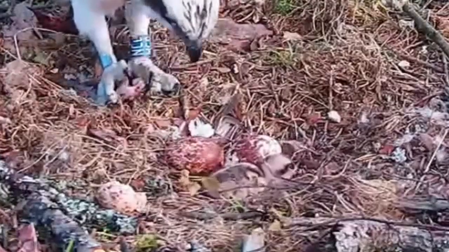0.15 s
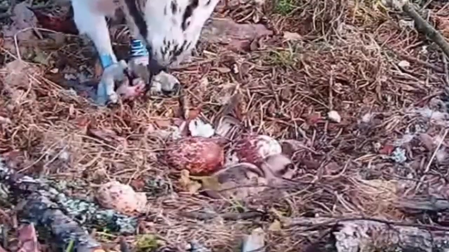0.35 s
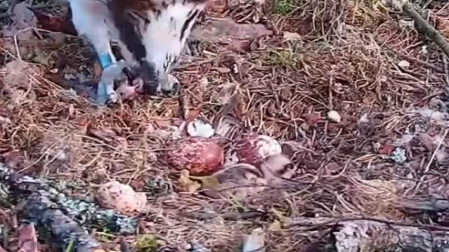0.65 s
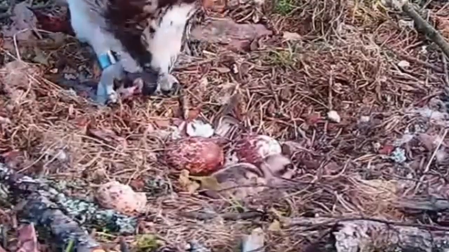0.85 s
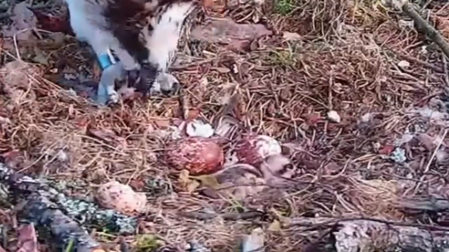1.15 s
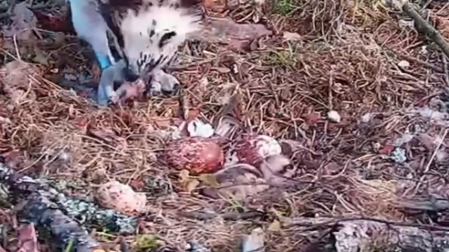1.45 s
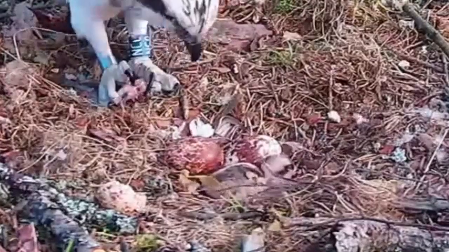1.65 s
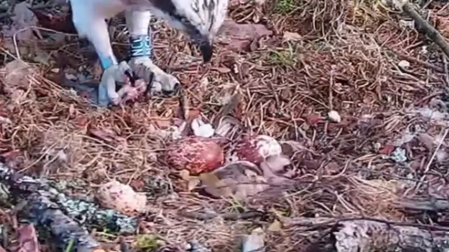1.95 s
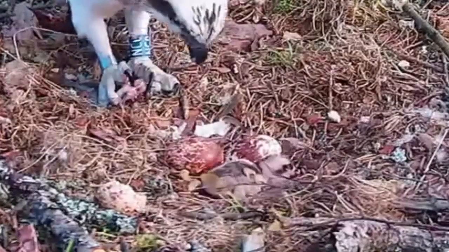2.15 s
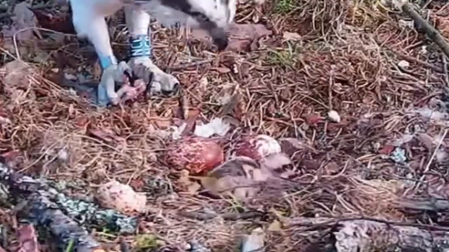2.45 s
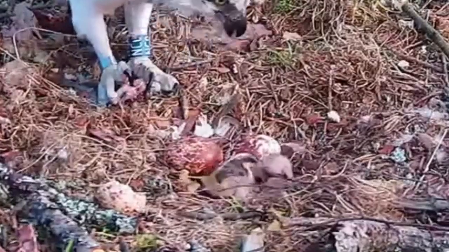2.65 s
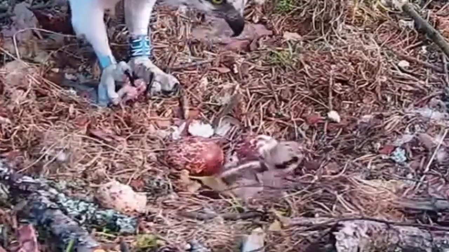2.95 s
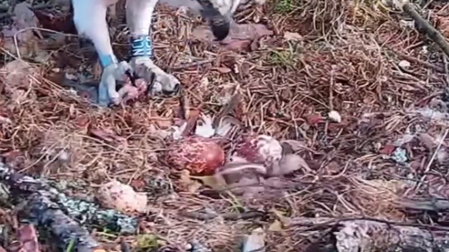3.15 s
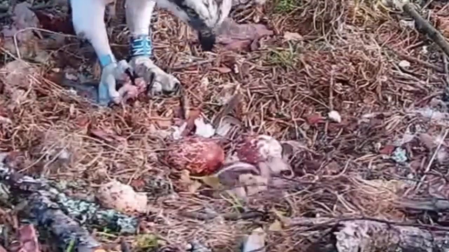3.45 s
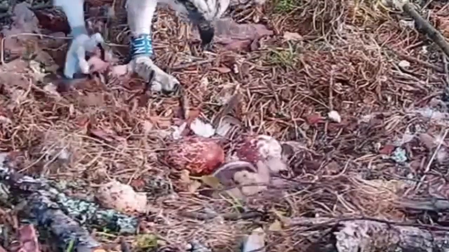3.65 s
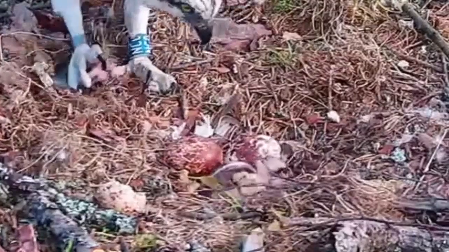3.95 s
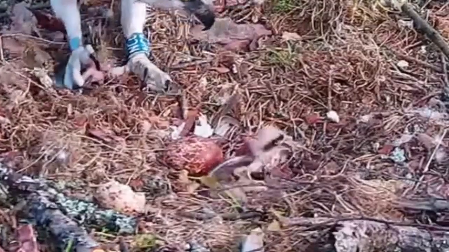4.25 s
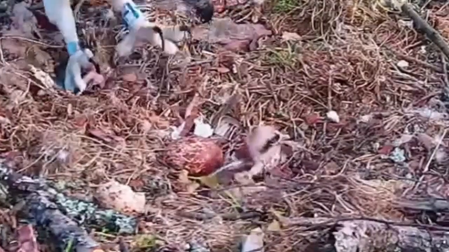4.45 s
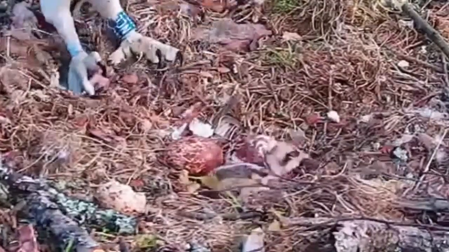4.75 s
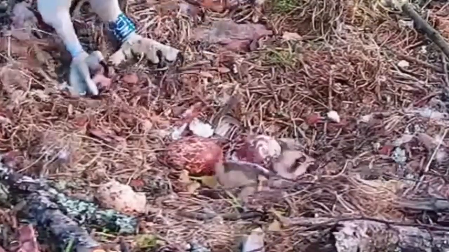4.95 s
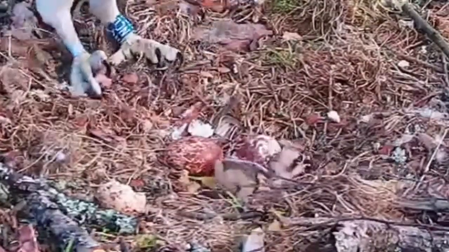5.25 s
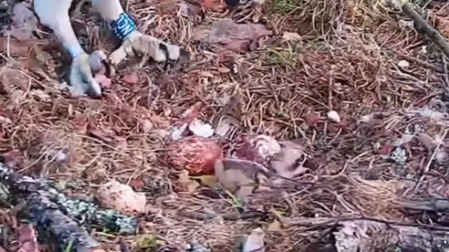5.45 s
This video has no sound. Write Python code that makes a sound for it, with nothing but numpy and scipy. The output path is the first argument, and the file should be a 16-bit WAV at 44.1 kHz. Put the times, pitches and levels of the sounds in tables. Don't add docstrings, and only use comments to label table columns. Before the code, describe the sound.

A nestling's short hoarse peeps sound close by over low rumbling wind, then a more distant songbird whistles, buzzes and trills with a woodland echo.

```python
import sys
import numpy as np
from scipy import signal
from scipy.fft import rfft, irfft
from scipy.io import wavfile
from scipy.ndimage import uniform_filter1d

SR = 44100
rng = np.random.default_rng(int(sys.argv[2]) if len(sys.argv) > 2 else 0)


def gain_from_db(level_db):
    decades = np.asarray(level_db, float) / 20
    return 10 ** decades


def bounce(signal):
    frames = np.transpose(np.atleast_2d(signal))
    limited = np.clip(frames, -1, 1)
    pcm = np.round(limited * 32767).astype(np.int16)
    wavfile.write(sys.argv[1], SR, pcm)


N = 246959
TIME_S = np.arange(N) / SR

# start_s, length_s, top_hz, level_db, closing_swell_db
PEEPS = [
    (0.217, 0.054, 2720, -55.5, 5.5),
    (0.545, 0.057, 2605, -56.5, 9),
    (1.061, 0.062, 2276, -59, 13),
    (1.403, 0.056, 2770, -56, 9),
    (1.743, 0.054, 2764, -56.5, 7),
    (2.046, 0.076, 3060, -56, -1),
    (2.39, 0.06, 3150, -55.5, 11.5),
    (2.702, 0.043, 2800, -58, 20),
]
# length_share, slack_to_top_share, relative_db, swell_share
PEEP_SHAPE = [(0, .86, -3, 0), (.22, 1, 0.5, 0), (0.481, .94, -1, 0), (.7, .6, -4, 0.0067),
              (0.852, .2, -3.5, 0.64), (1, 0.037, -15.5, 1)]
# start_s, length_s, first_hz, second_hz, level_db
STEADY_PIPS = [(.46, 0.019, 2510, 2520, -66), (.492, 0.022, 2010, 2000, -72),
               (2.709, 0.011, 1510, 1550, -57), (5.457, 0.039, 1710, 1744, -50.5)]
ARCHED_PIPS = [(5.334, 0.063, 1600, 2040, -58)]
EASED_PIPS = [(4.404, .054, 1387, 2050, -63), (4.39, .05, 760, 1050, -68)]

# length_share, first_to_second_pitch_share, relative_db
CLIMB = [(0, 0.016, -15), (.4, 0.151, -11), (.7, .45, -7), (1, 1, 0)]
LIFT = [(0, 0.027, 6), (0.502, 0.51, -2.5), (1, 1, 2)]
EASE = [(0, 0.052, -0.042), (.3, 0.73, -2.7), (.65, .92, -2), (1, 1, -1.3)]
SOAR = [(0, 0, -4), (.15, .42, 0), (.33, .76, 0), (.6, .92, -2), (1, 0.94, -1)]
DROP = [(0, 0.028, 5), (.42, 0.11, -13), (1, 1, -24)]
SLIDE = [(0, 0.04, -11), (.17, 0.173, -4), (.5, .44, -2), (1, 1, -6.5)]
ARCH = [(0, 0.069, -1.5), (.3, 1, -7), (.65, 1, -7), (1, 0.25, -3)]
SWOOP = [(0, 0, -10), (.07, .4, 0), (.13, .64, -10), (.2, .82, -2), (.5, 1, -3.5), (.8, .92, -1),
         (.9, 1.06, -3), (1, 1.55, -10)]
HANG = [(0, 0, -1), (.08, .45, -7), (.2, .72, -1.5), (0.519, 0.96, 1), (.8, 1, 1), (1, .85, -5)]
STEADY = [(0, 0, -20), (.27, .3, -11), (.35, .4, 3), (.6, 1, 3), (.82, .8, -2.5), (1, 0, -24)]
# start_s, length_s, first_hz, second_hz, level_db; the last arch doubles the
# 5.334 s pip an octave up
CLIMBS = [(1.612, 0.029, 4520, 6270, -60), (2.765, .04, 3300, 3760, -56), (3.57, 0.055, 2950, 4160, -60),
          (3.65, 0.051, 4140, 4300, -52.5), (3.77, 0.033, 2600, 3750, -58), (3.985, 0.029, 2570, 4560, -55),
          (4.185, 0.037, 2515, 4720, -53.5), (4.908, 0.042, 2950, 4650, -54),
          (4.922, 0.027, 3000, 4240, -49.5)]
LIFTS = [(1.728, 0.021, 4350, 6200, -65.5), (2.808, .022, 3360, 3900, -71),
         (3.022, .024, 4380, 4830, -69.5), (3.213, .022, 3380, 3750, -73),
         (3.653, 0.041, 2650, 3190, -66.5), (3.7, 0.035, 4300, 4550, -66), (3.838, 0.021, 3170, 3270, -65),
         (4.008, 0.0091, 3500, 3680, -61), (4.215, .007, 3910, 3660, -58),
         (4.335, 0.015, 3040, 2330, -64.5), (5.22, 0.064, 5420, 6830, -75), (5.325, 0.028, 4900, 5840, -76),
         (5.36, 0.03, 5900, 6800, -71), (5.478, 0.024, 5800, 6600, -70)]
EASES = [(1.935, 0.037, 3600, 4610, -66), (3.562, 0.09, 4380, 4066, -58), (3.798, 0.025, 2620, 2190, -66),
         (3.99, 0.03, 2650, 3650, -61.5)]
UNDERTONES = [(2.03, .082, 3150, 3480, -72), (2.29, .09, 2900, 3230, -69), (2.49, .076, 2950, 3340, -70.5),
              (2.975, .04, 3230, 3550, -68)]
SOARS = [(5.447, 0.023, 4130, 5800, -66.5), (5.562, 0.036, 3800, 5950, -62.5)]
DROPS = [(2.108, 0.015, 3420, 2520, -66), (4.028, 0.036, 4200, 3050, -57),
         (4.234, 0.028, 4230, 3220, -53.5)]
SLIDES = [(1.968, 0.067, 5180, 4030, -63.5), (3.305, 0.13, 3470, 2470, -58)]
ARCHES = [(4.903, 0.011, 2950, 2940, -57), (3.532, 0.031, 3260, 3100, -60), (3.695, 0.092, 4850, 5260, -61),
          (3.77, .075, 4800, 5020, -69), (3.876, 0.031, 2800, 2910, -65), (5.148, 0.021, 3530, 4000, -58),
          (5.334, 0.055, 3200, 4100, -70)]
SWOOPS = [(2.126, 0.13, 5760, 4080, -65.5), (2.32, 0.12, 6060, 4010, -64), (2.518, .122, 5740, 3960, -61),
          (2.914, 0.13, 5550, 3870, -63.5)]
HANGS = [(3.352, .188, 5330, 4190, -58.5)]
# offset_s, pitch_hz, relative_db
WARBLE = [(0, 2957, -7), (.01, 3436, -1), (.027, 2900, -1), (.046, 2490, -18), (.088, 3210, 3.5),
          (.108, 3720, -12), (.121, 4300, -2.5), (.141, 2950, -12)]
# start_s, level_db
WARBLES = [
    (2.7, -54.5),
    (3.102, -61.5),
]
# offset_s, pitch_hz, relative_db
FLICK = [(0, 4740, -9), (.003, 4520, 5.5), (.007, 3750, 3.5)]
ANSWER = [(0.013, 2900, -2), (0.023, 2800, -4.5), (.031, 2310, -4), (.04, 2250, -4)]
# start_s, level_db
FIGURES = [
    (4.396, -66),
    (4.474, -68),
    (4.549, -63),
    (4.628, -62),
    (4.704, -59.5),
]
# start_s, length_s, centre_hz, first_db, last_db
THIN_TRILLS = [(1.83, .055, 4910, -65, -74), (3.175, .03, 4800, -70, -69), (3.5, 0.031, 4800, -69, -57),
               (3.545, 0.039, 4740, -63, -67), (3.585, 0.034, 4550, -61, -60.5),
               (3.715, .06, 4570, -55, -65), (3.775, .07, 4640, -63, -62), (3.928, 0.048, 5020, -58, -75),
               (4.133, 0.013, 4900, -64, -54), (4.148, 0.014, 4740, -59, -53),
               (4.168, 0.013, 4940, -69, -71), (5.1, 0.12, 2290, -70, -67)]
HARSH_TRILLS = [(3.8, 0.17, 3590, -63, -73), (4.02, 0.043, 3620, -57, -68), (4.06, .075, 3600, -70, -62),
                (4.23, 0.037, 3700, -58, -66), (4.27, 0.11, 3630, -66, -66.5), (4.38, 0.14, 2900, -73, -70),
                (4.54, 0.06, 2720, -74, -64), (4.61, 0.095, 2800, -74, -83), (4.75, 0.084, 2690, -63, -69),
                (4.952, 0.033, 3850, -58, -64), (4.975, 0.082, 3700, -70, -65)]
SLOW_TRILLS = [(5.0, 0.042, 3400, -76, -67), (5.04, 0.092, 3270, -61.5, -63),
               (5.12, 0.08, 3180, -63, -62.5), (5.2, 0.06, 3200, -66, -69), (5.26, 0.055, 3300, -68, -69)]
# swing_hz, rate_hz, unevenness_0_to_1
THIN_SWING = (450, 215, .25)
HARSH_SWING = (540, 265, .3)
SLOW_SWING = (295, 110, .13)
# delay_s, level_db
ECHOES = [(.0082, -10), (.0195, -16)]

# time_s, level_db
GUSTS = [(0, -48.5), (.5, -46.5), (.8, -46.5), (.96, -38.5), (1.15, -47), (1.3, -40), (1.62, -37.5),
         (1.76, -34), (2.1, -36), (2.45, -46), (3.05, -43), (3.5, -38.5), (3.7, -32), (4.1, -37.5),
         (4.6, -36), (4.96, -33.5), (5.1, -30), (5.6, -31.5)]
# centre_s, length_s, over_gust_db
LEVEL_BUMPS = [(.57, .06, 3), (1.31, .08, 3), (1.78, .06, 4), (2.44, .08, -6), (2.63, .1, 4), (2.73, .08, -3),
               (2.8, .06, 4), (2.92, .07, 4), (2.98, .06, -4), (3.24, .1, 4), (3.89, .08, -4), (4.42, .12, -3),
               (4.55, .1, 5), (4.65, .06, -8), (4.71, .05, -9), (4.79, .1, 3), (5.07, .07, 6), (5.16, .06, 2),
               (5.42, .1, -3), (5.51, .08, 6), (5.592, .05, -14)]
# freq_hz, density_db
RUMBLE = [(8.8, -40), (15, -2), (54, 0.5), (81, -4), (110, -11.5), (140, -20), (240, -120)]
BUFFET = [(59, -54), (100, -1), (268, -17.5), (590, -32), (700, -33.5), (910, -49), (1540, -120)]
# start_s, length_s, level_db, centre_hz, width_hz
RUSTLES = [
    (3.925, .022, -73, 7500, 1500),
    (4.41, .1, -68.5, 7300, 4400),
    (4.44, .08, -76, 13500, 4000),
    (4.2, .7, -65.5, 1900, 2600),
    (-.3, 1.1, -64, 420, 400),
    (4.735, .065, -69, 6000, 11000),
    (4.79, .055, -70, 5500, 7000),
    (1.3, .3, -73, 5000, 1200),
]
# start_s, peak_db, ring_hz, t60_s
TICKS = [(1.3677, -41, 720, .028), (4.765, -56, 8800, .01), (4.765, -58, 14200, .01),
         (4.771, -54, 6100, .03), (4.767, -50, 900, .012), (4.7705, -50, 1500, .008),
         (4.772, -54, 3500, .012), (4.304, -57, 3500, .015), (.748, -55, 1700, .008),
         (2.021, -54, 2700, .01), (1.374, -59, 4800, .02), (1.516, -56, 3200, .008),
         (5.5935, -26.5, 36, .3), (2.3895, -47.5, 2950, .04), (2.7015, -48, 2450, .05)]
# freq_hz, density_db
AIR = [(150, -2), (250, -0.5), (579, -6.5), (815, -4.5), (1480, -12.5), (7060, -24), (11000, -29.5),
       (14200, -29), (15000, -36)]
# time_s, level_db
LEAVES = [
    (0, -72.5),
    (.5, -73),
    (1.3, -72),
    (2.2, -77),
    (3.3, -76.5),
    (4.2, -79),
    (5.6, -80.5),
]
# centre_hz, width_hz, relative_db
FOLIAGE = [(5200, 1300, -6.5), (7100, 2300, -1), (8900, 2800, -8)]
# from_s, pitch_hz
WHINE = [(0, 15625), (1.19, 15592), (1.28, 15608), (1.38, 15642), (2.02, 15625), (2.87, 15608),
         (2.95, 15625), (3.05, 15608), (3.14, 15625), (3.97, 15592), (4.07, 15625), (5.09, 15608),
         (5.27, 15625)]


def unit(x):
    return x / np.sqrt(np.mean(x ** 2))


def coloured(points):
    hz, db = np.transpose(points)
    bins_hz = np.arange(1, N // 2 + 2) * SR / N
    gain = gain_from_db(np.interp(np.log(bins_hz), np.log(hz), db, left=-120, right=-120))
    return unit(irfft(rfft(rng.standard_normal(N)) * gain, N))


def hump(hz, width_hz, edge_db=-25):
    return coloured([
        (max(hz - 0.94 * width_hz, hz / 8), edge_db),
        (max(hz - width_hz / 2, hz / 3), -3),
        (hz, 0),
        (hz + width_hz / 2, -3),
        (hz + 2.2 * width_hz, edge_db)])


def walk(rate_hz, size=N):
    hold = max(int(SR / rate_hz), 1)
    steps = np.repeat(rng.standard_normal(size // hold + 1), hold)
    return 1.42 * uniform_filter1d(uniform_filter1d(steps, hold), hold)[:size]


def notes(rows, shape):
    return [[(s + u * length_s, hz0 + way * (hz1 - hz0), db + rel_db) for u, way, rel_db in shape]
            for s, length_s, hz0, hz1, db in rows]


def voice(call, edge_s, flutter_db, wobble, swing_hz=0., rate_hz=1., uneven=0.,
          round_s=.0067, octave_db=-60., throat_hz=2800.0, scoop=0.):
    s, hz, db = np.transpose(sorted(call))
    a, b = int((s[0] - edge_s) * SR), min(int((s[-1] + edge_s) * SR), N)
    size = b - a
    t = TIME_S[a:b]
    pitch_hz = uniform_filter1d(np.interp(t, s, hz), int(round_s * SR), mode="nearest")
    onset_sag = scoop * np.exp(-(t - t[0]) / 0.00193)
    end_sag = scoop / 3 * np.exp((t - t[-1]) / 0.0024)
    pitch_hz = pitch_hz * (1 - onset_sag - end_sag)
    glide_hz_per_s = np.gradient(pitch_hz) * SR

    falling = np.clip(-glide_hz_per_s / 30000, 0, 1)
    octave = gain_from_db(octave_db) * falling / (1 + ((2 * pitch_hz - throat_hz) / 420) ** 2)
    swing = np.sin(2 * np.pi * np.cumsum(rate_hz * (1 + uneven * walk(80.3, size=size))) / SR)
    reach_hz = swing_hz * (1 + uneven * walk(54, size=size))
    wobble = wobble + .013 * np.clip(glide_hz_per_s / 35000, 0, 1)
    sung_hz = pitch_hz * (1 + wobble * walk(300, size=size)) + reach_hz * swing
    phase = 2 * np.pi * np.cumsum(sung_hz) / SR

    fade = np.clip(np.minimum(t - t[0], s[-1] + edge_s - t) / (2 * edge_s), 0, 1)
    level = gain_from_db(np.interp(t, s, db) + flutter_db * walk(250.7, size=size))
    out = np.zeros(N)
    out[a:b] = np.sqrt(2) * fade * level * (np.sin(phase) + octave * np.sin(2 * phase))
    return out


def forest(x, t60_s, wet_db, gap_s):
    t = TIME_S[:SR // 2]
    tail = rng.standard_normal(len(t)) * gain_from_db(-60 * t / t60_s) * (t > gap_s)
    tail = tail / np.sqrt(np.sum(tail ** 2))
    return x + gain_from_db(wet_db) * signal.fftconvolve(x, tail)[:N]


def chick():
    slack_hz = 1200
    arches = [[(s + u * length_s, slack_hz + way * (top_hz - slack_hz), db + rel_db + share * swell_db)
               for u, way, rel_db, share in PEEP_SHAPE]
              for s, length_s, top_hz, db, swell_db in PEEPS]
    peeps = sum(voice(call, .0015, 2.1, .01, octave_db=-5.5, scoop=.22) for call in arches)
    clear = notes(STEADY_PIPS, STEADY) + notes(ARCHED_PIPS, ARCH) + notes(EASED_PIPS, EASE)
    pips = sum(voice(call, .003, 1.2, .002) for call in clear)
    return forest(peeps, t60_s=.1, wet_db=-8.5, gap_s=.004) + pips


def songbird():
    kinds = ((CLIMBS, CLIMB), (LIFTS, LIFT), (EASES + UNDERTONES, EASE), (SOARS, SOAR), (DROPS, DROP),
             (SLIDES, SLIDE), (ARCHES, ARCH), (SWOOPS, SWOOP), (HANGS, HANG))
    whistles = [call for rows, shape in kinds for call in notes(rows, shape)]
    whistles += [np.add(WARBLE, (s, 0, db)).tolist() for s, db in WARBLES]
    figures = [np.add(part, (s, 0, db)).tolist() for s, db in FIGURES for part in (FLICK, ANSWER)]
    clear = sum(voice(call, .004, 2.3, .003) for call in whistles)
    clear = clear + sum(voice(call, .0015, 2, .01, round_s=.002) for call in figures)

    buzzes = ((THIN_TRILLS, THIN_SWING), (HARSH_TRILLS, HARSH_SWING), (SLOW_TRILLS, SLOW_SWING))
    trills = sum(voice([(s, hz, db0), (s + length_s, hz, db1)], .007, 3.4, .014, *swing)
                 for rows, swing in buzzes for s, length_s, hz, db0, db1 in rows)

    echoes = sum(gain_from_db(db) * np.roll(clear, int(s * SR)) * (TIME_S > s) for s, db in ECHOES)
    far_clear = forest(clear + echoes, t60_s=0.62, wet_db=-10.5, gap_s=0.0065)
    far_trills = forest(trills, t60_s=.44, wet_db=-6, gap_s=.003)
    return gain_from_db(-0.5) * far_clear + gain_from_db(-1.5) * far_trills


def wind():
    gust_db = np.interp(TIME_S, *np.transpose(GUSTS))
    gust_db = gust_db + sum(db * np.exp(-(2 * (TIME_S - s) / length_s) ** 2) for s, length_s, db in LEVEL_BUMPS)
    rumble = gain_from_db(gust_db + 2.1 * walk(12)) * coloured(RUMBLE)
    buffet_db = -40 - 11.5 + 0.77 * (gust_db + 40)
    return rumble + gain_from_db(buffet_db + 0.78 * walk(20)) * coloured(BUFFET)


def litter():
    out = np.zeros(N)
    for s, length_s, db, hz, width_hz in RUSTLES:
        arc = np.sin(np.pi * np.clip((TIME_S - s) / length_s, 0, 1))
        swell = np.sqrt(np.clip(arc, 0, 1))
        out += gain_from_db(db + 2.5 * walk(400)) * swell * hump(hz, width_hz)
    for s, db, hz, t60_s in TICKS:
        start = int(s * SR)
        t = TIME_S[:min(SR // 20, N - start)]
        attack = np.minimum(t / .001, 1)
        out[start:][:len(t)] += gain_from_db(db - 60 * t / t60_s) * attack * np.sin(2 * np.pi * hz * t)
    return out


def air():
    level_db = np.interp(TIME_S, *np.transpose(LEAVES))
    leaves = sum(gain_from_db(level_db + db + 2.5 * walk(27.9)) * hump(hz, width_hz, edge_db=-23)
                 for hz, width_hz, db in FOLIAGE)
    hiss = gain_from_db(-59.5 + .4 * walk(2.83)) * coloured(AIR + [(16000, -23)])
    return hiss + leaves


def whine():
    field_hz = 50
    s, hz = np.transpose(WHINE)
    pitch_hz = hz[np.searchsorted(s, TIME_S, side="right") - 1]
    phase = 2 * np.pi * np.cumsum(pitch_hz) / SR
    field = 2 * np.pi * field_hz * TIME_S
    throb = 1 + .3 * np.sin(field) + .4 * np.sin(2 * field)
    return gain_from_db(-68) * throb * np.sin(phase)


def scene():
    return (chick() + songbird() + wind() + litter() + air() + whine())[None]


def roll_off(x):
    return signal.sosfilt(signal.butter(12, 15930, fs=SR, output="sos"), x)


def record(dry):
    top_hz = 15715
    bins_hz = np.arange(N // 2 + 1) * SR / N
    edge = np.clip((top_hz + 30 - bins_hz) / 40, 0, 1)
    mix = irfft(rfft(dry) * edge, N)
    return roll_off(mix)


dry = scene()
out = record(dry)
bounce(out)
```